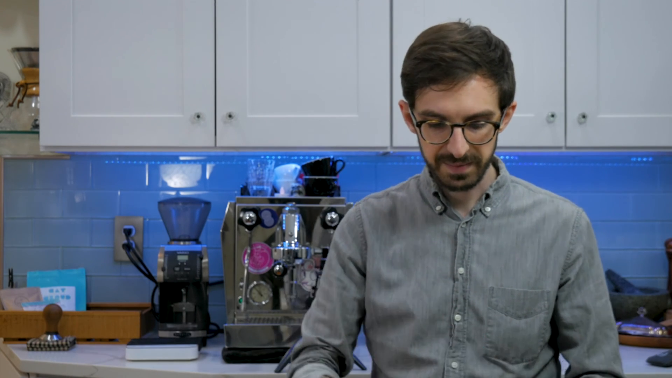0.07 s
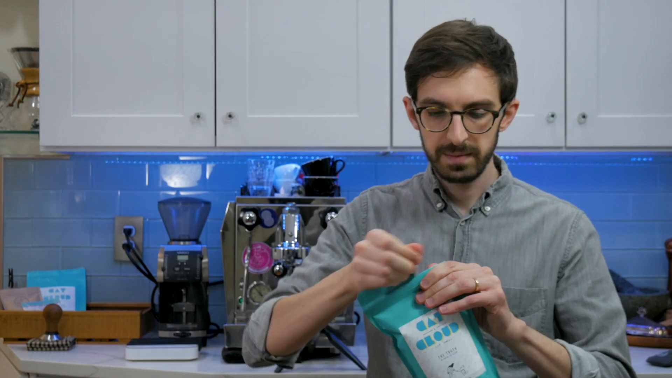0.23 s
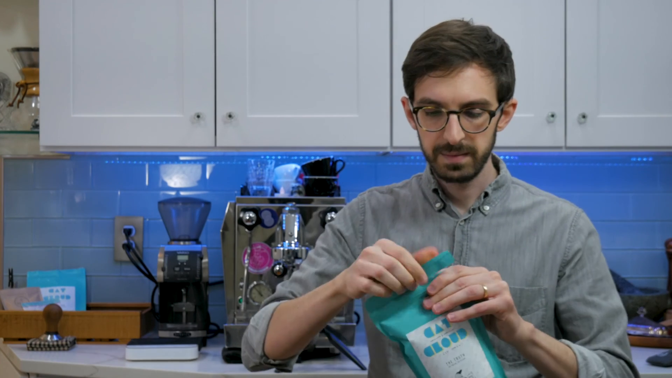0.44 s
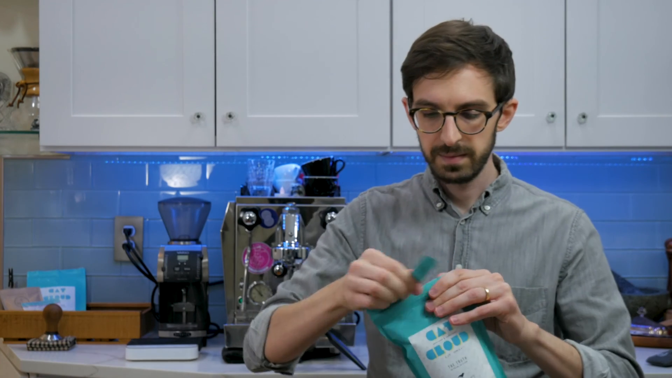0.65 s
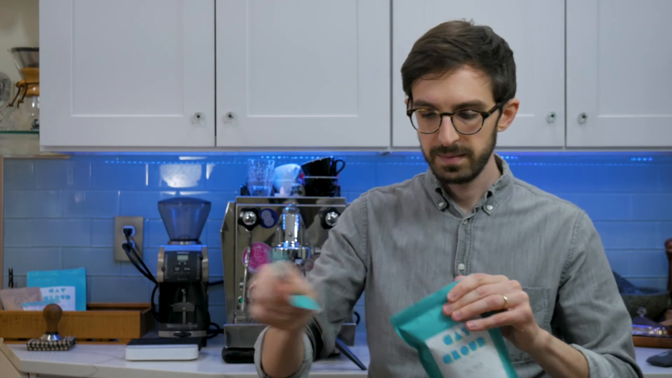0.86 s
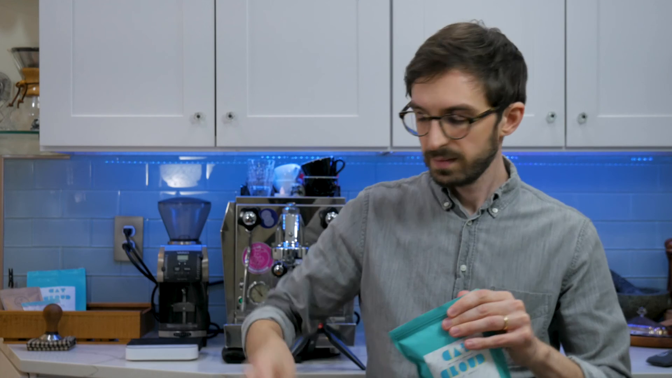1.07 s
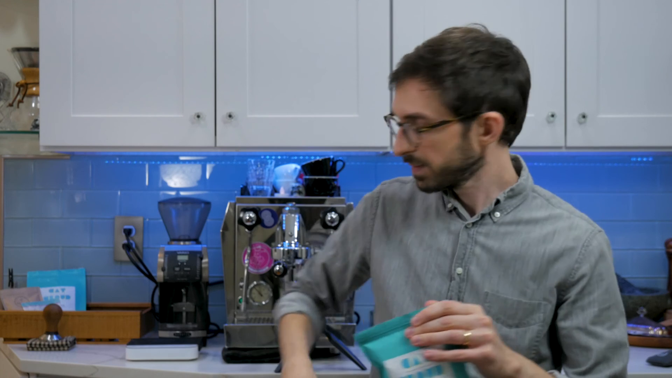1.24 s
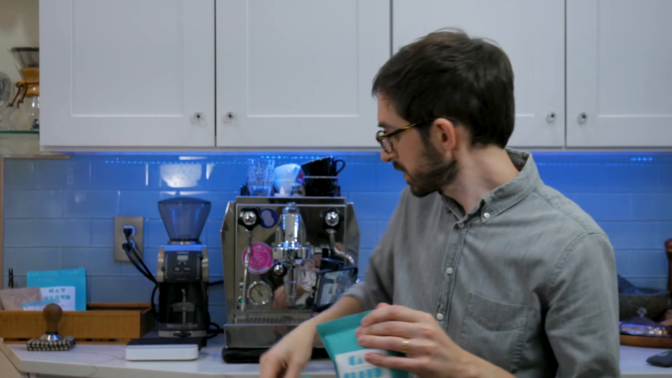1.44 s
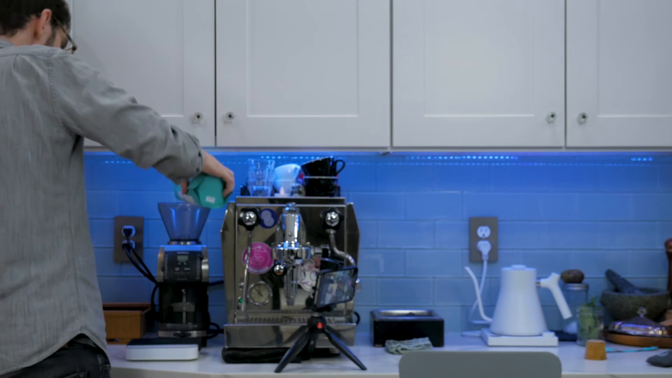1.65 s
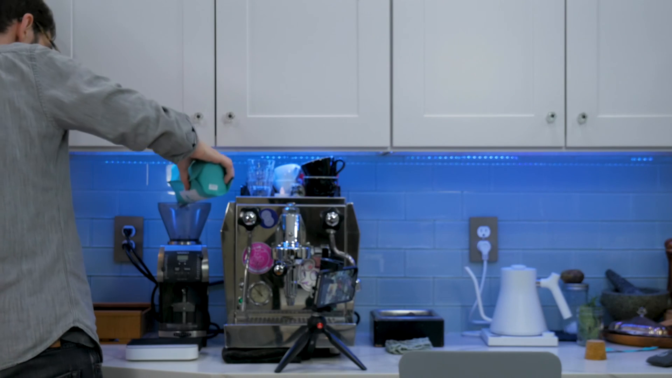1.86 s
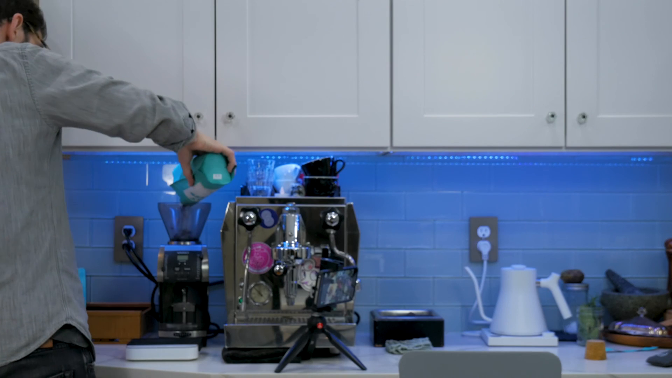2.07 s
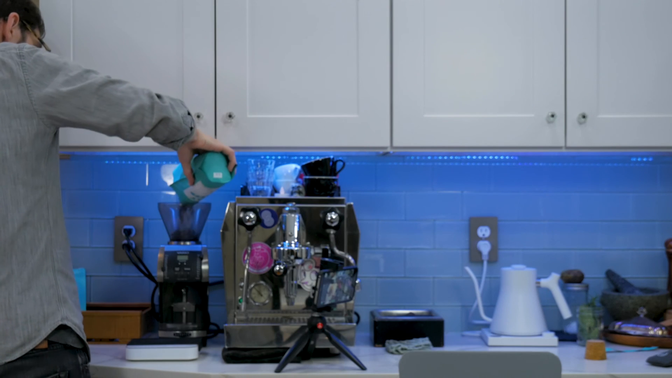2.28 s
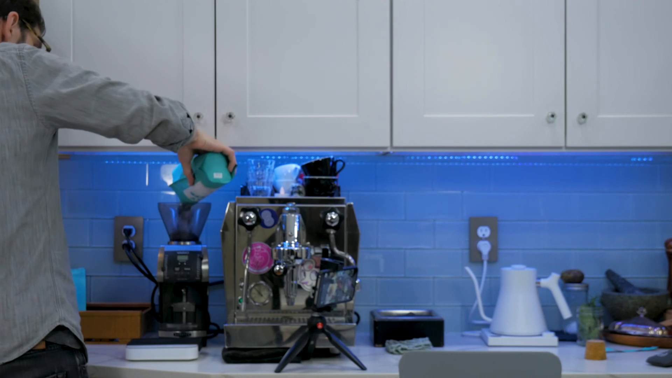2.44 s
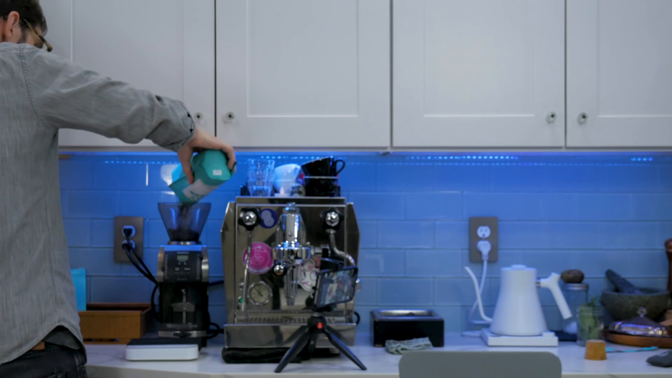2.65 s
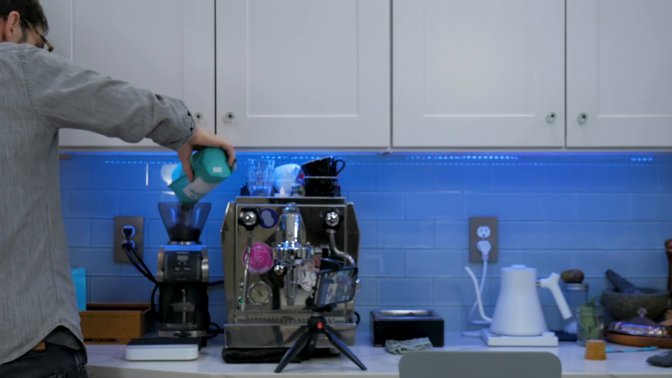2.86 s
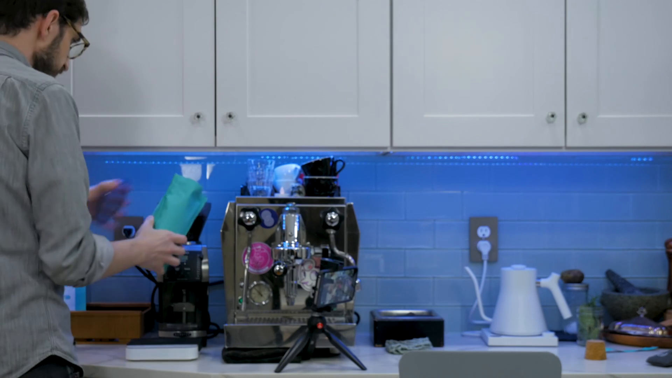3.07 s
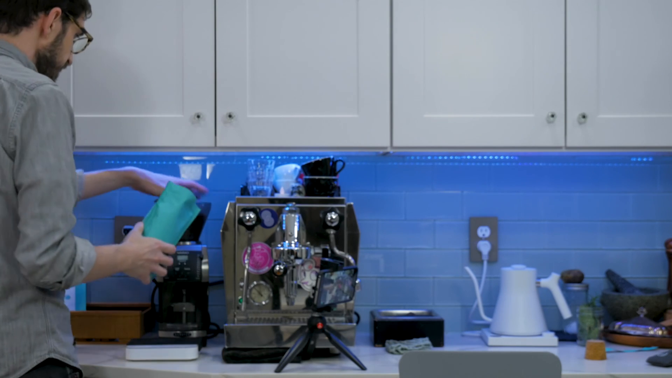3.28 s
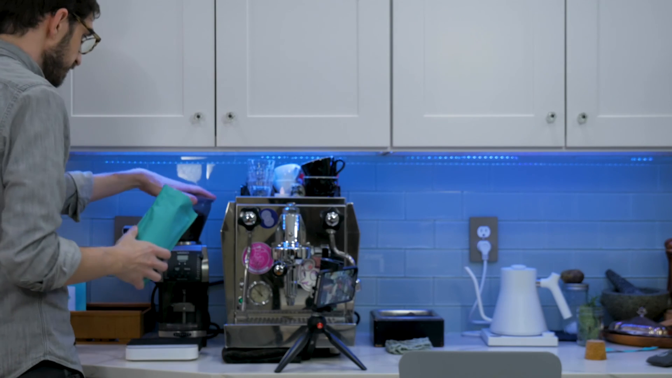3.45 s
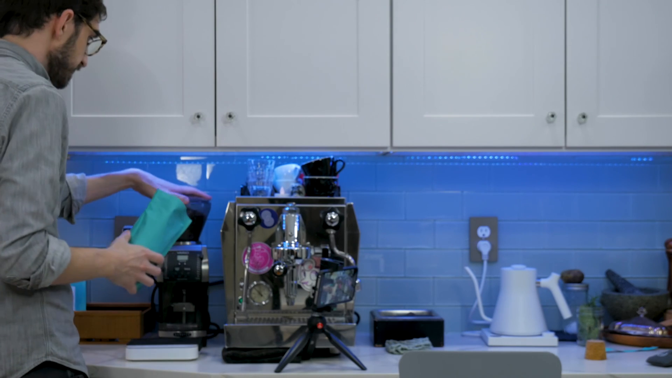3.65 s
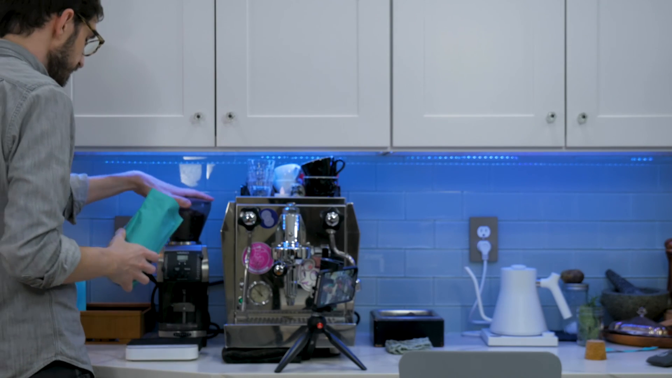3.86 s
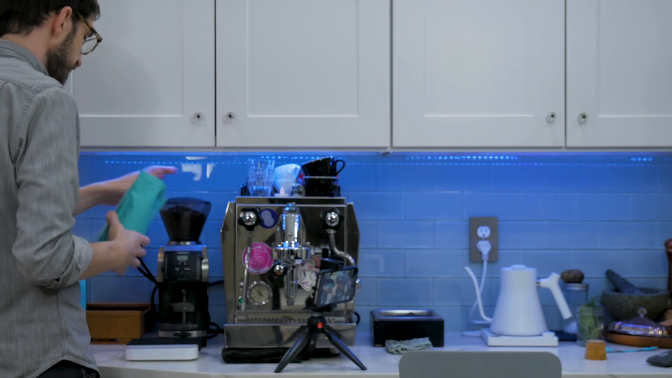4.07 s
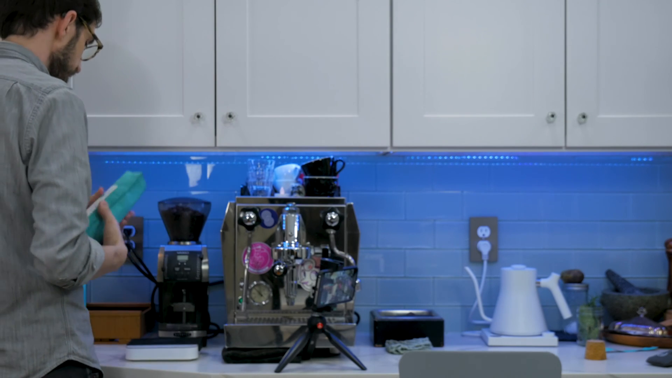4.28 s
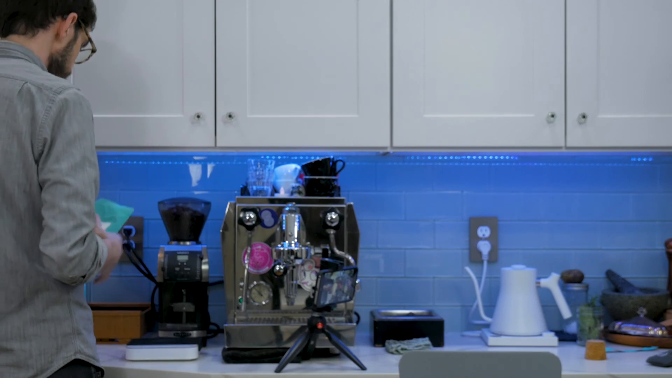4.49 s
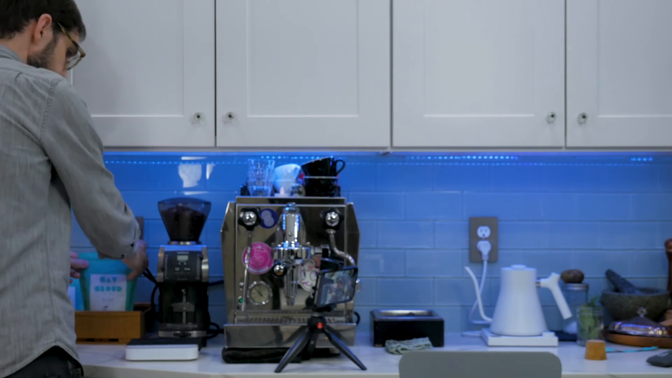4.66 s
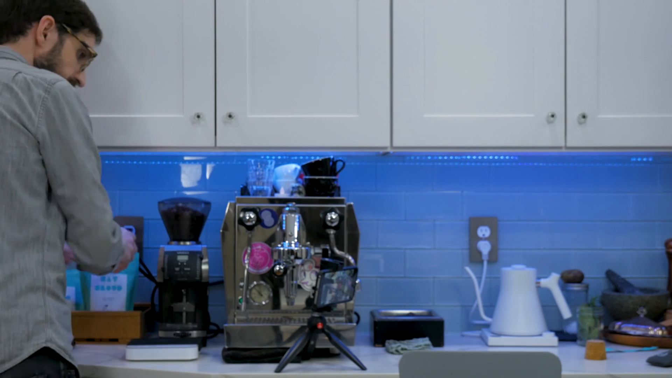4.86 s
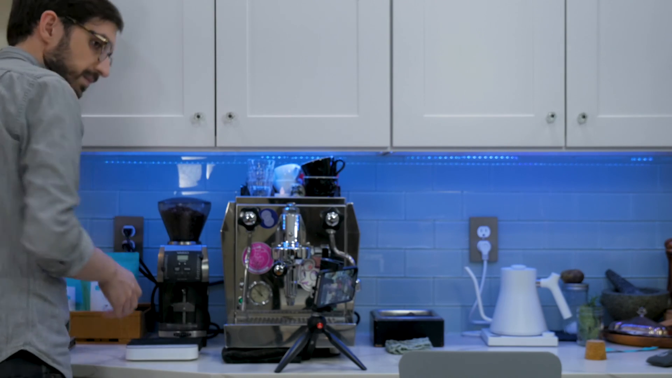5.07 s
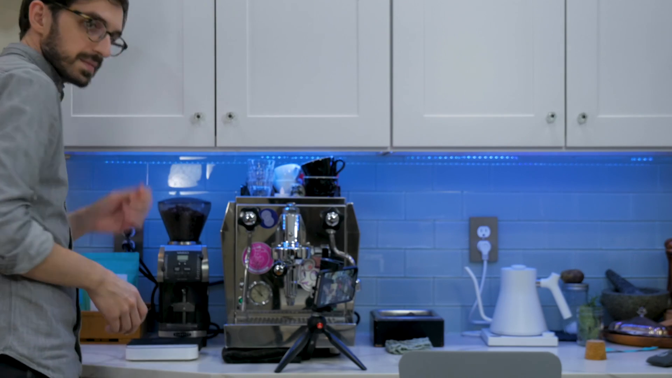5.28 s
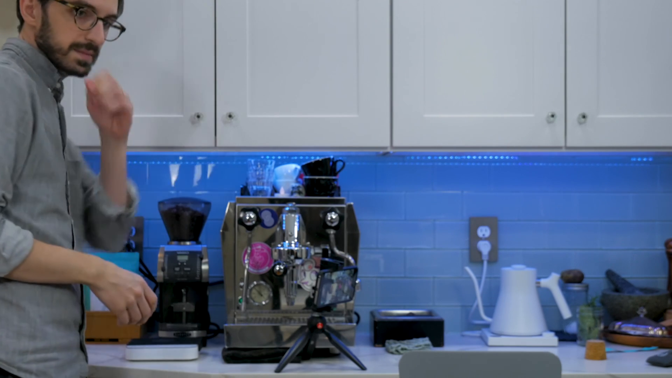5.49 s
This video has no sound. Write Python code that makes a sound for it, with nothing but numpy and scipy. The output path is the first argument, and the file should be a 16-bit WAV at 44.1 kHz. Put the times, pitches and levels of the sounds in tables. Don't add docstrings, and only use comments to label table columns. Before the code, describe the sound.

A stiff coffee bag is torn open, then beans rush ringing into a grinder hopper, followed by rattly lid presses and crinkling as the bag is put away.

```python
import sys
import numpy as np
from scipy import signal
from scipy.fft import rfft, irfft
from scipy.io import wavfile
from scipy.ndimage import uniform_filter1d

SR = 44100
rng = np.random.default_rng(int(sys.argv[2]) if len(sys.argv) > 2 else 0)


def convert_level_to_amplitude(level_db):
    exponent = np.asarray(level_db, float) / 20
    return 10 ** exponent


def unload_wav(signal):
    wavfile.write(
        sys.argv[1],
        SR,
        np.round(np.clip(np.atleast_2d(signal).T, -1, 1) * 32767).astype(np.int16),
    )


N = 243652


def rms_one(x):
    return x / np.sqrt(np.mean(x ** 2) + 1e-20)


def in_time(rows):
    s, *columns = np.transpose(rows)
    t = np.arange(N) / SR
    return [np.interp(t, s, c) for c in columns], (t >= s[0]) & (t <= s[-1])


def at_hz(points, hz):
    table_hz, values = np.transpose(points)
    return np.interp(np.log(hz), np.log(table_hz), values)


def colour(x, spectrum):
    size = 4096
    hz = np.maximum(np.arange(size // 2 + 1), .5) * SR / size
    cepstrum = irfft(np.log(convert_level_to_amplitude(at_hz(spectrum, hz))))
    cepstrum[1:size // 2] *= 2
    cepstrum[size // 2 + 1:] = 0
    return signal.fftconvolve(x, irfft(np.exp(rfft(cepstrum))))[:N]


def band(x, low_hz, high_hz, order=2):
    sos = signal.butter(order, [low_hz, min(high_hz, .45 * SR)], "band", fs=SR, output="sos")
    return signal.sosfilt(sos, x)


def ring(clicks, hz, width_hz):
    r, w = np.exp(-np.pi * width_hz / SR), 2 * np.pi * hz / SR
    return signal.lfilter([0, np.sin(w)], [1, -2 * r * np.cos(w), r * r], clicks + 1e-18)


def drift(rate):
    r = np.exp(-2 * np.pi * rate / SR)
    return rms_one(signal.lfilter([1], [1, -2 * r, r * r], rng.standard_normal(N + SR))[SR:])


def grains(per_s, spread_db):
    sizes = convert_level_to_amplitude(spread_db * np.minimum(rng.exponential(1, N), 5)) * rng.choice([-1, 1], N)
    born = rng.random(N) < per_s / SR
    return sizes * born / np.sqrt(per_s / SR) / np.sqrt(np.mean(sizes ** 2))


def body(clicks, modes):
    return sum(convert_level_to_amplitude(db) * np.sqrt(width) * ring(clicks * rng.standard_normal(N), hz, width)
               for hz, width, db in modes)


# t/s, level/dB
FLOW = [
    (2.048, -31.5),
    (2.075, -25.5),
    (2.1, -25.5),
    (2.3, -22),
    (2.62, -22.5),
    (2.836, -26),
    (3.07, -30.5),
]
# t/s, wall level/dB, click level/dB
FIRST_BEANS = [(1.931, -12.5, -13.5), (1.946, -19.5, -21), (1.951, -10.5, -18.5), (1.96, -13.5, -24),
               (1.981, -20.5, -15.5), (2.004, -34, -9), (2.014, -28, -14.5), (2.028, -21.5, -26.5),
               (2.054, -13.5, -16.5), (2.072, -11, -12), (2.09, -23.5, -24)]
# f/Hz, width/Hz, level/dB
HOPPER = [(721, 30, -17), (1310, 14, -18), (1418, 26, -8), (2356, 24, -8), (2770, 14, -6), (3311, 55, 0),
          (3972, 18, -5), (4270, 58, -15), (4620, 120, -8), (5358, 36, -9), (6380, 64, -12),
          (6935, 60, -10), (7605, 40, -12)]
# f/Hz, width/Hz, level/dB
WALL_CLUSTER = [(3036, 24, -12), (3201, 40, -7), (3250, 30, -13), (3406, 30, -6), (3483, 24, -8),
                (3554, 20, -11), (4854, 30, -8)]
# f/Hz, width/Hz, level/dB
BEAN_TICK = [(4610, 180, -5), (8460, 320, 2), (8810, 270, 1)]


def pour():
    cut = CUTS_S[2]
    trickle_db, trickle_s, trickle_fade_db = -51, 0.18, 27
    trickle = [(cut, FLOW[-1][1]), (cut, trickle_db), (cut + trickle_s, trickle_db - trickle_fade_db)]
    (beans_db,), gate = in_time(FLOW + trickle)
    t = np.arange(N) / SR
    dulling_db_per_s, buried_s, burying_db_per_s = 4, 2.7, 27.5
    wall_db = beans_db - 7 - dulling_db_per_s * (t - FLOW[0][0])
    wall_db = wall_db - burying_db_per_s * np.maximum(t - buried_s, 0)
    full_hits_per_s, hits_follow = 2500, 0.24
    surge = full_hits_per_s * convert_level_to_amplitude(hits_follow * (beans_db - beans_db.max()) + 3.7 * drift(28))
    wall = body(gate * grains(0.36 * surge, spread_db=3.0), HOPPER + WALL_CLUSTER)
    ticks = body(gate * grains(0.9 * surge, spread_db=3.0), BEAN_TICK)
    heap = rms_one(clatter(gate * grains(.45 * surge, spread_db=1.5))) + 0.19 * rms_one(ticks)
    wall = convert_level_to_amplitude(wall_db) * wall / np.std(band(wall, 2600, 3700, order=3)[gate])
    heap = convert_level_to_amplitude(beans_db - 2.0) * heap / np.std(band(heap, 3800, 14000, order=3)[gate])
    lone = np.zeros((2, N))
    bounces = rng.standard_normal((len(FIRST_BEANS), 256)) * np.exp(-np.arange(256) / 70)
    for (s, *db), bounce in zip(FIRST_BEANS, bounces):
        lone[:, round(s * SR):][:, :256] += convert_level_to_amplitude(db)[:, None] * bounce
    first = 0.0023 * body(lone[0], HOPPER + WALL_CLUSTER) + 0.14 * clatter(lone[1])
    hollow_hz, hollow_width_hz = 2530, 110
    hollow = signal.iirnotch(hollow_hz, hollow_hz / hollow_width_hz, fs=SR)
    stream = signal.lfilter(*hollow, wall + heap + first)
    return band(stream, 670, 19000, order=3) + hard_beans() + dust()


# f/Hz, level/dB
CLATTER = [(900, -45.5), (1500, -37), (2750, -14), (3280, 1), (3700, -7.5), (4800, -5), (5900, -4),
           (7000, -3.5), (8700, -4.5), (10000, -7.5), (12100, -14.5), (14200, -15), (16000, -25.5)]


def clatter(hits):
    t, place = np.arange(3000) / SR, rng.integers(0, 6, N)
    responses = rng.standard_normal((6, len(t))) * convert_level_to_amplitude(-60 * t / 0.075)
    responses[:, 0] = 8.8
    struck = sum(signal.oaconvolve(hits * (place == k), response) for k, response in enumerate(responses))
    return colour(struck, CLATTER)


# t/s, peak level/dB
HIGH_TICKS = [(2.1092, -12.5), (2.1358, -13), (2.1521, -21), (2.166, -13.5), (2.1851, -12.5), (2.2124, -14),
              (2.2383, -16.5), (2.2454, -18), (2.2517, -16), (2.2836, -23.5), (2.3145, -13), (2.3279, -18),
              (2.3406, -18.5), (2.3481, -17.5), (2.3669, -11), (2.3785, -15.5), (2.4043, -17.5),
              (2.414, -18.5), (2.4252, -19), (2.4379, -17.5), (2.4453, -19), (2.4887, -21), (2.5155, -23.5),
              (2.5265, -22.5), (2.5387, -18.5), (2.5586, -19.5), (2.5664, -14.5), (2.5925, -17),
              (2.6219, -25), (2.6294, -25.5), (2.6374, -19), (2.652, -15), (2.661, -20.5), (2.6742, -16.5),
              (2.6917, -20), (2.7192, -18), (2.7296, -18.5), (2.7745, -15), (2.781, -18.5), (2.7893, -22),
              (2.8114, -21), (2.8414, -21.5), (2.8508, -21.5), (2.862, -21), (2.8779, -15), (2.8863, -19.5),
              (2.9083, -22), (2.9158, -23), (2.9289, -26.5), (2.9807, -38), (2.996, -29), (3.0284, -30),
              (3.049, -34), (3.0673, -32.5), (3.0865, -27.5)]
# t/s, peak level/dB
LOW_TICKS = [(2.1128, -23.5), (2.1649, -28.5), (2.1751, -18), (2.1877, -17), (2.2112, -11), (2.2474, -20),
             (2.2946, -16), (2.3089, -12), (2.3234, -20), (2.3734, -23.5), (2.3881, -15.5), (2.4009, -15),
             (2.413, -19), (2.4254, -18), (2.4368, -21.5), (2.4486, -23.5), (2.4784, -23), (2.5278, -21),
             (2.5512, -19), (2.6093, -20), (2.6251, -17), (2.6561, -22.5), (2.6915, -17), (2.705, -18.5),
             (2.7206, -12.5), (2.7322, -26), (2.7642, -20.5), (2.7886, -21), (2.799, -22), (2.8405, -20),
             (2.902, -22.5), (2.9188, -26), (2.9443, -28.5), (2.9639, -25.5), (2.9809, -29.5),
             (3.0019, -32.5), (3.0175, -30), (3.0276, -27), (3.0615, -31), (3.0796, -26)]
# t/s, peak level/dB
WALL_STRIKES = [(2.1471, -13), (2.163, -18.5), (2.1851, -16), (2.1999, -22.5), (2.222, -15),
                (2.2386, -19.5), (2.268, -11), (2.3204, -18), (2.3414, -15.5), (2.3638, -11), (2.3783, -13),
                (2.3959, -20.5), (2.4069, -19.5), (2.4255, -22.5), (2.4395, -15), (2.4575, -14),
                (2.4903, -14), (2.5282, -14.5), (2.5477, -23.5), (2.5602, -18.5), (2.603, -12.5),
                (2.6177, -22), (2.6302, -18.5), (2.6587, -17.5), (2.6773, -23.5), (2.7077, -24),
                (2.7305, -27.5), (2.7469, -22), (2.7762, -19.5), (2.7932, -23), (2.8112, -19),
                (2.8324, -27.5), (2.851, -21.5), (2.8647, -42.5), (2.8785, -15.5), (2.8915, -36),
                (2.9036, -23), (2.9262, -25), (2.9471, -29.5), (2.9824, -32.5)]
# table, f/Hz, pitch scatter/share, t60/s, level/dB
STRUCK = [
    (HIGH_TICKS, 8600, 0.051, 0.026, -4.5),
    (LOW_TICKS, 4850, 0.056, 0.074, -7.5),
    (WALL_STRIKES, 3310, 0.014, 0.066, -5.5),
]


def hard_beans():
    out, t = np.zeros(N), np.arange(3000) / SR
    for table, hz, scatter, t60, db in STRUCK:
        for (s, peak_db), chance in zip(table, rng.uniform(-1, 1, (len(table), 2))):
            pair = np.sin(2 * np.pi * hz * (1 + scatter * chance[:, None]) * t)
            swell = 1 - np.exp(-t / 0.00027)
            out[round(s * SR):][:len(t)] += convert_level_to_amplitude(peak_db + db - 60 * t / t60) * swell * (pair[0] + 0.3 * pair[1])
    return out


def dust():
    t = np.arange(N) / SR - CUTS_S[2]
    fade_db_per_s = 217
    level_db = -53 - fade_db_per_s * np.maximum(t - .09, 0) + 2.5 * drift(30)
    return (t > 0) * convert_level_to_amplitude(level_db) * rms_one(band(rng.standard_normal(N), 9500, 14000))


# t/s, level/dB
SLIDE = [
    (1.634, -42),
    (1.71, -40),
    (2.04, -43),
    (2.136, -38),
    (2.636, -38),
    (3.093, -40.5),
]
# f/Hz, level/dB
SLIDE_COLOUR = [(88, -55), (150, -32), (334, -15.5), (589, -6), (702, -4.5), (923, -3.5), (998, -5),
                (1170, -4.5), (1870, -4.5), (2220, -8.5), (11700, -21), (16000, -29)]
# f/Hz, width/Hz, level/dB
SLIDE_MODES = [(738.3, 5.4, 2), (989, 34, 3.5), (1312, 30, 0.5), (1960, 420, -3.5)]


def slide():
    (level_db,), gate = in_time(SLIDE)
    contacts = grains(3000 * convert_level_to_amplitude(2.5 * drift(23)), spread_db=1.0)
    source = rms_one(colour(contacts, SLIDE_COLOUR)) + .5 * rms_one(body(contacts, SLIDE_MODES))
    return gate * convert_level_to_amplitude(level_db) * source / np.std(band(source, 310, 3597, order=3))


EDGES_HZ = [170, 500, 2500, 6000, 16000]


def played(source, moves, low_db, top_db):
    s, length, level_db, fade, bright_db = np.transpose(moves)[:, :, None]
    t = np.arange(0, N + 32, 32) / SR - s
    grip_db_per_s, let_go_db_per_s = 12000, 900
    level_db = level_db - fade * np.clip(t, 0, length)
    level_db = level_db - grip_db_per_s * np.maximum(-t, 0) - let_go_db_per_s * np.maximum(t - length, 0)
    low_follows, top_follows = -0.27, 1.72
    tilts = low_db + low_follows * bright_db, 0, bright_db, top_db + top_follows * bright_db
    out = 0
    for tilt, low, high in zip(tilts, EDGES_HZ, EDGES_HZ[1:]):
        gain = np.interp(np.arange(N) / 32, np.arange(t.shape[1]), convert_level_to_amplitude(np.max(level_db + tilt, axis=0)))
        out = out + gain * rms_one(band(source, low, high, order=3))
    return out


# t/s, length/s, crackle level/dB, fade/(dB/s), brightness/dB
TEARING = [(0.0, 0.079, -49, -36, 1), (.088, 0.034, -33.5, -200, -9.5), (0.12, 0.25, -39.5, 111, 1),
           (.262, 0.016, -56.5, -500, 5), (0.277, 0.082, -37.5, -16, -5), (0.36, 0.071, -37, 148, -4.5),
           (0.493, 0.025, -52, -100, -1.5), (0.518, 0.02, -35.5, 137, -15), (0.583, 0.092, -50.5, 18, -2.5),
           (0.682, 0.016, -55, -500, -1), (.766, 0.067, -32.5, -19, -3), (0.844, 0.073, -30, 22, -6.5),
           (.92, 0.23, -58, 133, 6.5), (1.13, 0.041, -71.5, 20, 10.5), (1.21, 0.047, -86.5, 20, 18),
           (1.36, 0.091, -79, -32, 10.5), (1.436, 0.2, -58, -21, -3.5)]
# t/s, length/s, crackle level/dB, fade/(dB/s), brightness/dB
BRUSHING = [
    (3.793, 0.028, -36.5, -300, -5),
    (3.812, 0.079, -26.5, 267, -5.5),
    (3.878, 0.039, -25.5, 288, -3),
    (3.905, 0.19, -29.5, 148, -7),
]
# t/s, length/s, crackle level/dB, fade/(dB/s), brightness/dB
STOWING = [(3.092, 0.26, -29, 117, -5.5), (3.165, 0.015, -46.5, 60, 3.5), (4.15, 0.29, -64.5, -88.5, -6),
           (4.283, 0.021, -51, 103, -12), (4.379, 0.028, -35, 200, 1), (4.407, 0.016, -30.5, 18, -5),
           (4.423, 0.05, -29, 119.5, 0), (4.471, 0.091, -28, 91.5, -3.5), (4.556, 0.08, -30, 138, -3),
           (4.634, 0.11, -27, 187, -9), (4.732, 0.056, -38, 5.5, -10), (4.793, 0.152, -44.5, 176, -10.5),
           (4.981, 0.054, -55, 32.5, 2), (5.218, 0.047, -68.5, -270, -6.5),
           (5.288, 0.11, -47.5, 249.5, -16), (5.418, 0.101, -68.5, -170, -12)]
# f/Hz, level/dB
BAG_COLOUR = [(59, -30), (100, 0.5), (185, -21), (271, -6), (315, -10), (398, -2), (736, -8), (910, -6.5),
              (1200, -3), (1610, -8), (8830, -21), (14100, -39), (16000, -34)]


def bag():
    crackle = grains(600 * convert_level_to_amplitude(6.5 * drift(30)), spread_db=2.8)
    buckle = np.clip(crackle, -9, 9)
    pitches, dealt = np.geomspace(170, 4000, 22), rng.integers(0, 22, N)
    panels = sum(ring(buckle * (dealt == k), hz, hz / 14.0) for k, hz in enumerate(pitches))
    rub = convert_level_to_amplitude(2.3 * drift(22.5)) * rng.standard_normal(N)
    sheet = colour(0.5 * crackle + 0.75 * rms_one(panels) + 1.2 * rub, BAG_COLOUR)
    jobs = (TEARING, -5.5), (BRUSHING, -3), (STOWING, -17.5)
    return convert_level_to_amplitude(-6.0) * sum(played(sheet, moves, low_db, top_db=-2.5) for moves, low_db in jobs)


# t/s, peak level/dB, f/Hz, bright/dB, room/dB
OPENING_SNAPS = [(.03, -45, 528, -18, -9), (.0875, -24, 2200, -12, -7), (.103, -21.5, 4080, -14, -17),
                 (.104, -19, 1450, -23, -19), (.111, -22.5, 905, -9, -18), (.123, -19.5, 4460, -23, -25),
                 (.1235, -20.5, 980, -17, -5), (.288, -19.5, 4200, -10, -5), (.298, -23, 3500, -5, -16),
                 (.315, -21, 1360, -10, 2), (.34, -33, 1900, -1, -2.5), (.381, -17, 1550, -15, -15),
                 (.494, -37, 2240, -5.5, -2), (.504, -32, 1200, -10.5, -16.5), (.515, -34, 3870, 10, -3.5),
                 (.527, -32.5, 2190, -2.5, -14), (.588, -33, 880, -25, -9), (.62, -31, 7300, 4.5, -13.5),
                 (.626, -32.5, 2380, 3, -5), (.692, -36, 2310, -2, -1), (.771, -20, 1410, -7, 3.5),
                 (.797, -18.5, 1500, 3, -12), (.808, -25, 1000, -20, -14), (.825, -30, 656, -24, -17),
                 (.859, -23, 1500, -15, -11), (.901, -21.5, 1270, -20, -6), (1.035, -36.5, 1680, -11, -8),
                 (1.149, -41.5, 2530, -11.5, -4), (1.428, -30.5, 1020, -45, -2.5)]
# t/s, peak level/dB, f/Hz, bright/dB, room/dB
CLOSING_SNAPS = [(3.26, -43, 4600, -9.5, -18), (3.299, -57, 9000, 0, -8), (3.389, -27, 1930, -0.5, -2),
                 (3.44, -20.5, 1254, 0.5, 1.5), (3.462, -22.5, 718, -20, -1),
                 (3.564, -23, 910, -14.5, -0.5), (3.809, -28.5, 680, -3.5, -3),
                 (3.813, -18.5, 3040, -4, -4), (3.874, -30.5, 1000, -7, -13), (3.8785, -14.5, 790, -3, -9),
                 (3.88, -9.5, 3440, -3, -8), (4.284, -46, 1004, -19, -3), (4.342, -35, 1000, -9, 1),
                 (4.379, -27.5, 2500, -12.5, -11), (4.406, -40, 1100, -20, -8),
                 (4.423, -17.5, 1496, -5.5, -1.5), (4.426, -17, 4900, -3.5, -5), (4.471, -17, 744, -1.5, 1),
                 (4.475, -20, 1190, -6.5, -4), (4.484, -23, 5200, -5.5, -14.5), (4.554, -17, 2070, -12, -3),
                 (4.635, -34, 1320, -20, 3), (4.769, -40, 1470, -20, -11), (4.988, -36.5, 2620, -2.5, -2.5),
                 (5.047, -42, 1296, -17, 0), (5.256, -46, 1260, -20, -11), (5.278, -40.5, 1087, -25, -18)]


def snaps():
    out, t = np.zeros((2, N)), np.arange(2048) / SR
    rows = OPENING_SNAPS + CLOSING_SNAPS
    noise = rng.standard_normal((len(rows), len(t)))
    noise[:, 0] = 5.1
    for (s, peak_db, hz, bright_db, room_db), puff in zip(rows, noise):
        knock = band(puff * np.exp(-t / 0.0035), hz / 2.27, hz * 2.0, order=3)
        crack = band(puff * np.exp(-t / 0.0018), 6300, 8800)
        crack = crack + 0.37 * band(puff * np.exp(-t / 0.0014), 3100, 12500)
        push = band(puff * np.exp(-t / 0.00016), 255, 476)
        parts = (-1.5, knock), (bright_db - 0.5, crack), (-27, push)
        snap = sum(convert_level_to_amplitude(db) * part / np.abs(part).max() for db, part in parts)
        out[:, round(s * SR):][:, :len(t)] += convert_level_to_amplitude([[peak_db], [peak_db + room_db]]) * snap
    return out


# t/s, length/s, rattle level/dB, fade/(dB/s), brightness/dB
PRESSES = [
    (3.39, 0.04, -30, 269.5, -5),
    (3.437, 0.067, -24, 38.5, -9),
    (3.51, 0.12, -29.5, 57, -9),
    (3.617, 0.045, -31, 1, -2),
    (3.656, 0.2, -29, 146, -9.5),
]
# f/Hz, width/Hz, level/dB
LID_MODES = [(528, 120, 5), (822, 59, 0), (1145, 61, 5), (1530, 32, -7), (1920, 140, 2), (2374, 61, -12.5),
             (3110, 23, -18.5)]


def lid():
    contacts = grains(2200 * convert_level_to_amplitude(4.0 * drift(35)), spread_db=3)
    source = rms_one(body(contacts, LID_MODES)) + 0.32 * rms_one(colour(contacts, BAG_COLOUR))
    return convert_level_to_amplitude(-2.5) * played(band(source, 520, 20000, order=3), PRESSES, low_db=-14.5, top_db=-11)


# t/s, peak level/dB, f/Hz, t60/s
BUMPS = [
    (1.514, -15, 100, 0.089),
    (1.558, -33, 81.9, 0.12),
    (1.599, -28.5, 80, 0.068),
    (3.441, -27.5, 159, 0.085),
    (3.47, -45.5, 80, 0.41),
    (3.88, -15.5, 167, 0.075),
    (3.901, -33, 328, 0.087),
    (3.93, -43, 252, 0.07),
    (3.989, -35, 173, 0.081),
    (4.041, -31, 240, 0.021),
]
# t/s, peak level/dB, f/Hz, t60/s
PINGS = [(.534, -35, 338, .03), (0.5896, -27.5, 335, 0.033), (.5887, -38, 830, 0.0097),
         (.824, -22.5, 652, 0.063), (.834, -25, 722, 0.088), (1.4264, -18.5, 960, 0.007),
         (1.4263, -39, 1610, 0.0056), (1.427, -29.5, 2520, 0.0055), (1.4267, -40, 3450, .006),
         (1.429, -42, 700, 0.034), (1.953, -20, 3310, 0.18), (2.006, -26.5, 2774, 0.16),
         (2.088, -14.5, 3317, 0.23), (3.459, -24, 1414, 0.065), (3.46, -27, 3430, 0.093),
         (3.478, -27, 2324, .1), (3.578, -28, 856, 0.18), (3.628, -29, 1870, .1), (3.8, -35.5, 1840, 0.044),
         (4.557, -32, 4180, 0.021), (4.635, -26, 563, 0.036), (.031, -41, 435, 0.084),
         (.0945, -24, 970, 0.013), (.316, -29, 1400, 0.044), (.772, -30, 1490, .06),
         (.81, -24.5, 1444, 0.074), (3.458, -23.5, 793, .1), (3.492, -24.5, 553, 0.11),
         (3.707, -34.5, 627, 0.11), (3.1, -37, 477, 0.26), (3.811, -28.5, 3540, .02),
         (3.811, -24, 730, 0.017), (4.282, -43, 990, .025), (4.361, -39, 1200, .02),
         (4.406, -26, 1130, 0.028), (4.471, -24.5, 626, 0.034), (4.475, -24, 830, 0.024),
         (4.541, -25.5, 886, .03), (4.655, -33, 520, 0.091), (4.735, -38, 1034, 0.092),
         (4.999, -49, 2090, .07), (4.99, -45.5, 2570, 0.062), (4.991, -54, 6500, 0.093),
         (4.995, -50, 3750, .067), (5.019, -52.5, 1095, .22), (5.049, -50, 1290, 0.089),
         (5.28, -43, 900, 0.0091)]


def bumps():
    out = np.zeros(N)
    for s, peak_db, hz, t60 in BUMPS + PINGS:
        t = np.arange(min(N - round(s * SR), SR // 2)) / SR
        swell = 1 - np.exp(-t * hz * (.9 if hz < 250 else 4.0))
        out[round(s * SR):][:len(t)] += convert_level_to_amplitude(peak_db - 60 * t / t60) * swell * np.sin(2 * np.pi * hz * t)
    return out


# t/s, f/Hz, level/dB
SQUEAK = [
    (4.728, 1410, -52),
    (4.768, 1530, -46.5),
    (4.83, 1512, -57.5),
    (4.96, 1490, -70),
]


def squeak():
    (hz, level_db), gate = in_time(SQUEAK)
    phase = 2 * np.pi * np.cumsum(hz) / SR
    rough = (1.2 + .35 * drift(40)) * np.sin(phase) + .5 * drift(40) * np.cos(phase)
    return gate * convert_level_to_amplitude(level_db) * rough


# f/Hz, t60/s
KITCHEN_T60 = [(200, 0.16), (1000, 0.47), (4000, 0.45), (12000, 0.31)]
CUTS_S = [0, 1.633, 3.093]


def kitchen(x):
    t, edges = np.arange(SR // 2) / SR, 90 * 2. ** np.arange(8.5)
    tail = np.zeros(len(t))
    for low, high in zip(edges, edges[1:]):
        t60 = at_hz(KITCHEN_T60, np.sqrt(low * high))
        tail += band(rng.standard_normal(len(t)), low, high) * convert_level_to_amplitude(-60 * t / t60)
    tail = (t > .004) * tail / np.sqrt(np.sum(tail ** 2))
    ends = [round(s * SR) for s in CUTS_S] + [N]
    return np.concatenate([signal.fftconvolve(x[a:b], tail)[:b - a] for a, b in zip(ends, ends[1:])])


# f/Hz, level/dB
FLOOR = [(12, -37), (20, -9), (146, 0.5), (222, 1.5), (277, -5), (357, 1), (923, -6.5), (1190, -9),
         (1960, -13), (3740, -18.5), (4060, -29), (8650, -25.5), (14700, -32), (16000, -49)]
# f/Hz, level/dB
HUM = [(220.7, -65.5)]


def floor():
    air = convert_level_to_amplitude(-61.5 + 0.56 * drift(2.9)) * rms_one(colour(rng.standard_normal(N), FLOOR))
    return air + sum(convert_level_to_amplitude(db) * rms_one(ring(rng.standard_normal(N), hz, 3.4)) for hz, db in HUM)


# f/Hz, level/dB
WIDTH = [(60, -20), (180, -26), (550, -21), (1650, -17), (8000, -13), (13000, -9)]


def difference(mid):
    level_db = 10 * np.log10(uniform_filter1d(mid ** 2, size=2048) + 1e-9)
    r = np.exp(-1 / (.3 * SR))
    growth_db = level_db - signal.lfilter([1 - r], [1, -r], level_db - level_db[0]) - level_db[0]
    kept = np.clip(.08 - .0125 * level_db - .05 * np.maximum(growth_db, 0), .12, .9)
    copy, frame = colour(mid * drift(60), WIDTH), np.arange(N) // 1024
    edges = np.linspace(6, 124, 21) ** 2
    chance = .4 * rng.random(frame[-1] + 1) + .6 * rng.random((20, frame[-1] + 1))
    gates = 1. * (chance < kept[::1024])[:, frame]
    return convert_level_to_amplitude(5.5) * sum(uniform_filter1d(gate, size=700) * band(copy, low, high)
                          for gate, low, high in zip(gates, edges, edges[1:]))


def scene():
    beans, handling = pour() + slide(), bag() + lid()
    blows, blows_far = snaps()
    mid = beans + handling + blows + bumps() + floor()
    mid = mid + kitchen(convert_level_to_amplitude(-9.0) * handling + blows_far + convert_level_to_amplitude(-7.0) * beans) + squeak()
    side = difference(mid)
    return np.array([mid + side, mid - side])


def low_pass(x):
    return signal.sosfilt(signal.butter(12, 15680, fs=SR, output="sos"), x)


def record(dry):
    rounded = .55 * np.tanh(dry / .55)
    mix = signal.sosfilt(signal.cheby2(16, 60, 16080, fs=SR, output="sos"), rounded)
    return low_pass(mix)


dry = scene()
out = record(dry)
unload_wav(out)
```